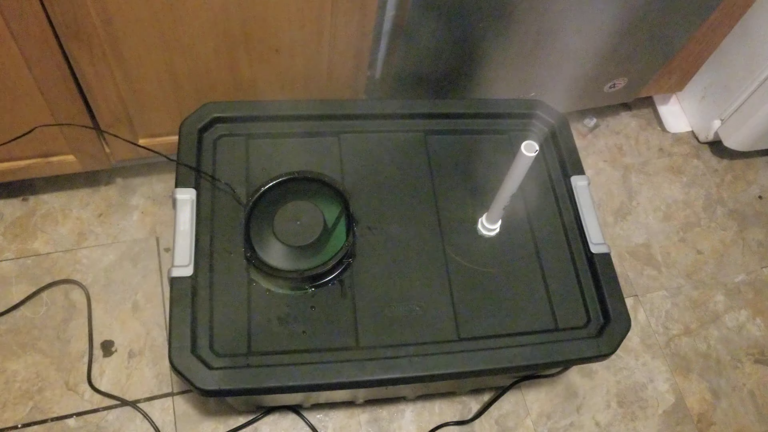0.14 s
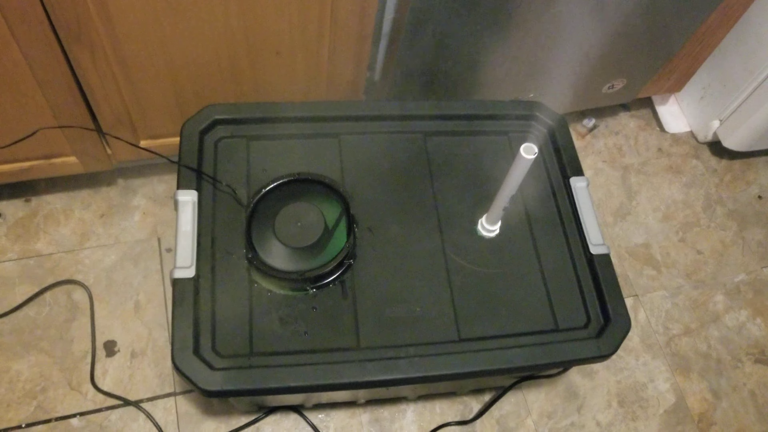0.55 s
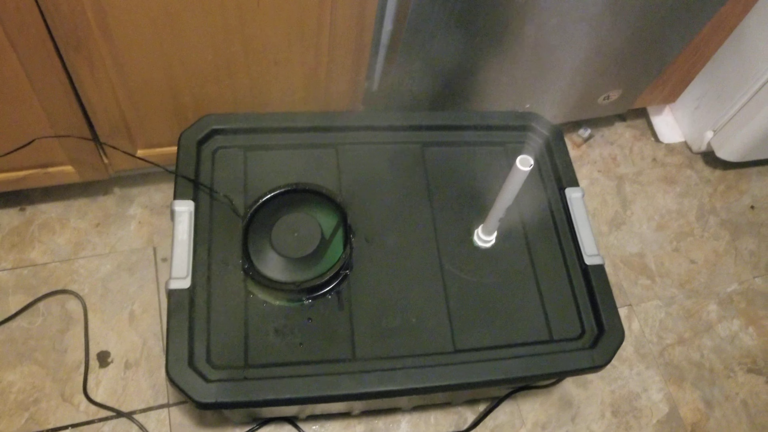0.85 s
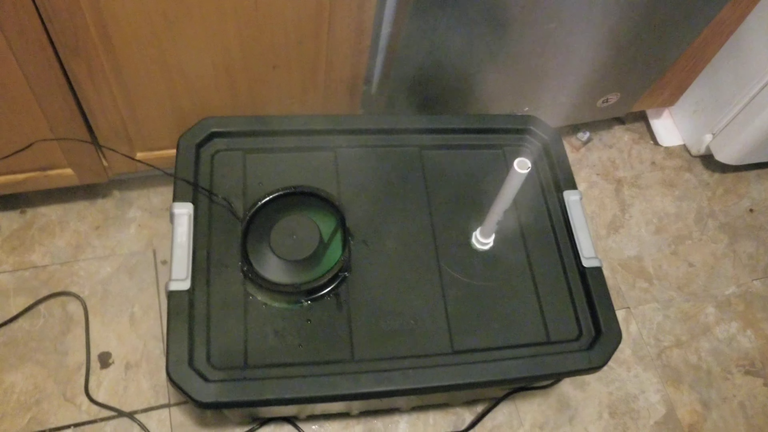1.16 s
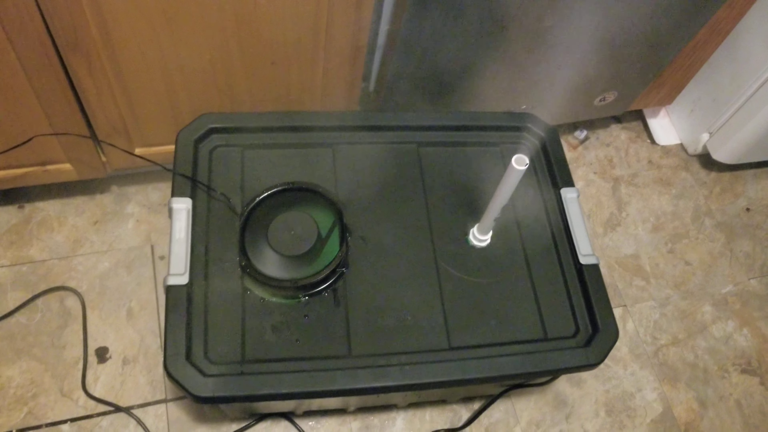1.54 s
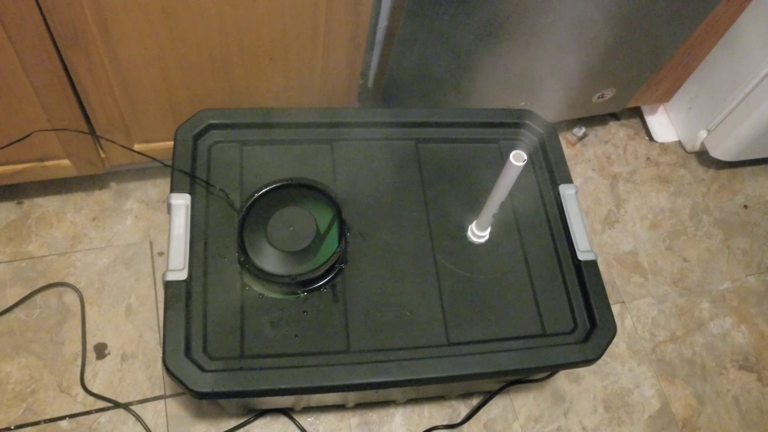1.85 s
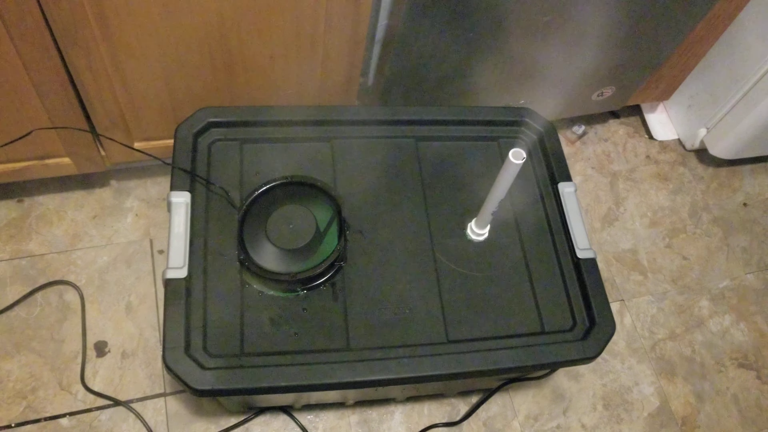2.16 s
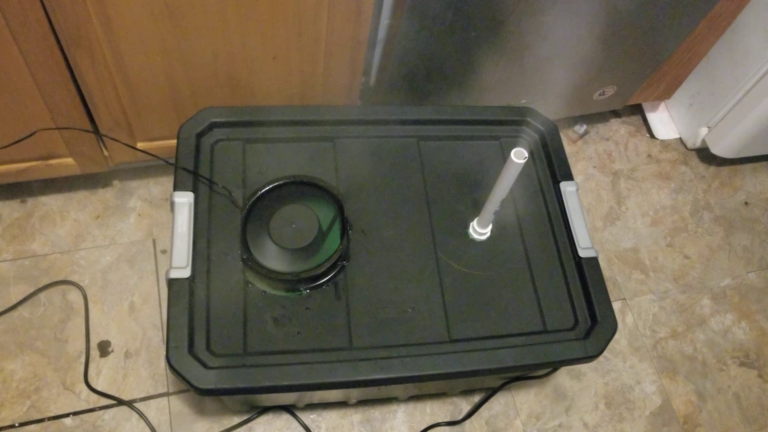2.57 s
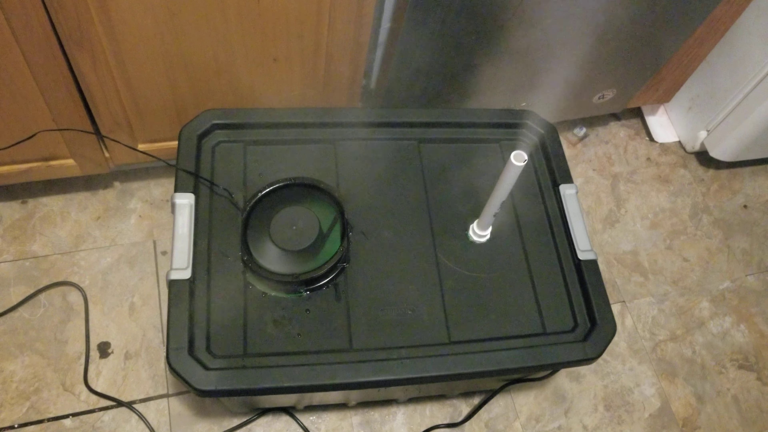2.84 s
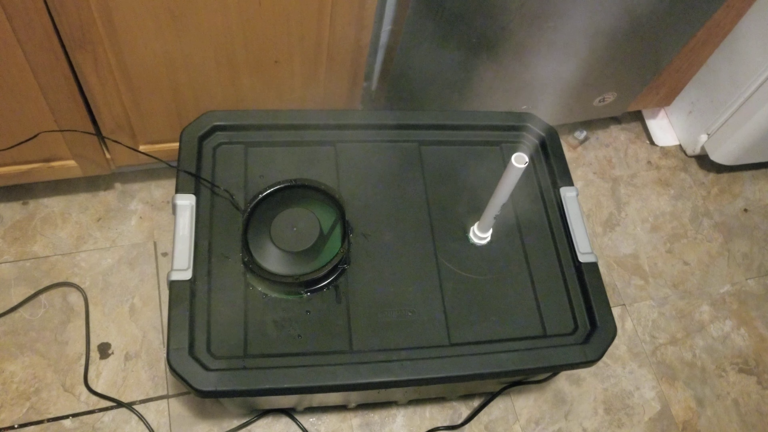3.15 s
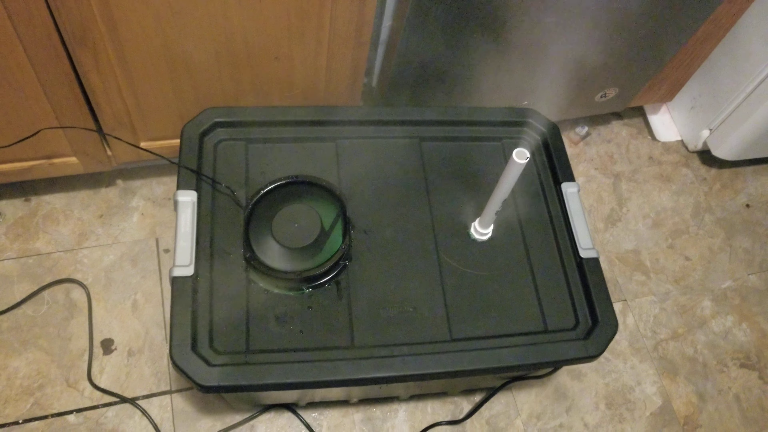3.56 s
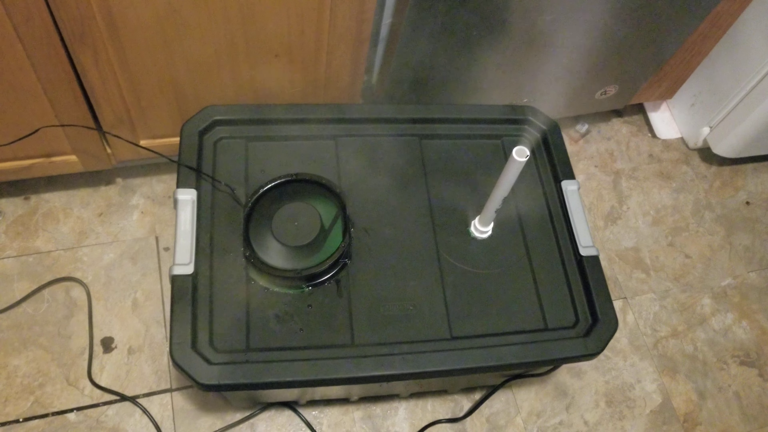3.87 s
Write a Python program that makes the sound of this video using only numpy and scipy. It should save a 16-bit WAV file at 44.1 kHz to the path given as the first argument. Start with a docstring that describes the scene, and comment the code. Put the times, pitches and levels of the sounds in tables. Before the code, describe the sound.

Small electric fan blowing with a hollow hum, a few faint drips and a close click.

```python
"""A small fan blows into a plastic tub on a tiled floor and drives mist out of a pipe.
After a short silence its turbulence fades in, booming in the tub and exciting narrow resonances over
a faint motor hum; a fine hiss and the tub's deep drone rise with it and swell and sink to the end.
A first drip falls, a very high, thin whistle arches up and down, and narrow bands of hiss swell briefly.
After a second drip comes one sharp click close by, at 1.6 s; then a few faint drips fall."""
import sys
import numpy as np
from scipy import signal
from scipy.fft import rfft, irfft
from scipy.io import wavfile

SR = 44100
rng = np.random.default_rng(int(sys.argv[2]) if len(sys.argv) > 2 else 0)


def to_wav(sig):
    """Store sig (one row per channel, or 1-D mono) as 16-bit WAV at the path in sys.argv[1].

    Samples outside -1..1 are clipped; the rate is SR.
    """
    pcm = np.clip(np.atleast_2d(sig), -1, 1) * 32767
    pcm = np.round(pcm).astype(np.int16)
    wavfile.write(sys.argv[1], SR, pcm.T)  # frames by channels


N = 176400
T, HZ = np.arange(N) / SR, np.maximum(np.fft.rfftfreq(N, 1 / SR), 1)


def from_db(db):
    """Amplitude ratio of a level in decibels."""
    return 10 ** (np.asarray(db) / 20)


def rms_one(x):
    """Normalisation to unit mean power."""
    return x / np.sqrt(np.mean(x ** 2) + 1e-20)


def at_hz(points):
    """Interpolation of a table on a log-frequency axis."""
    hz, value = np.transpose(points)
    return np.interp(np.log(HZ), np.log(hz), value)


def pan(db):
    """Constant-power panning: two gains, the left one higher by db."""
    gains = from_db(np.array([[.5], [-.5]]) * db)
    return gains / np.sqrt(np.mean(gains ** 2, axis=0))


def peak(centre_hz, half_width_hz):
    """Lorentzian curve: the amplitude halves one half-width from the centre."""
    return 1 / (1 + ((HZ - centre_hz) / half_width_hz) ** 2)


def drift(rate_hz):
    """Random fluctuation: low-pass noise of unit rms."""
    return rms_one(irfft(rfft(rng.standard_normal(N)) * peak(0, rate_hz), N))


# Likeness of the airflow's sound in the two channels: frequency_hz, coherence
COHERENCE = [(40, 0.89), (150, 1), (300, 0.99), (550, 0.89), (1000, 0.8), (1400, 0.67), (1600, 0.38),
             (1900, 0.82), (2600, 0.24), (4500, 0.29), (8000, 0.059), (11500, 0.25), (15500, .1)]
# Its balance between them: frequency_hz, left_over_right_db
AIR_BALANCE = [(100, 0.5), (300, 0), (500, 2), (800, -1.5), (1100, 5), (1600, -3.5), (2300, -1),
               (2800, -4.5), (3500, -2.5), (4000, 5.5), (4700, -11.5), (5500, -4), (7000, -0.5), (8200, 1),
               (9200, 1.5), (11000, 2.5), (12000, 2), (13300, 13), (15500, 19)]
# Its phase difference: frequency_hz, left_lead_rad
PHASE_LEAD = [(100, .03), (450, 0.11), (750, 0.48), (1200, 0.75), (1900, 1.55), (2500, 0.41), (2900, 3.76),
              (3700, 3.67), (4300, 4.1), (5000, 5.8), (6000, 6.5), (10500, 7.6), (12000, 8.6)]

def air_noise(spectrum, side_db=at_hz(AIR_BALANCE)):
    """Partial coherence: common and opposed noise add to a stereo pair of unit rms."""
    mid, side = rfft(rng.standard_normal((2, N)))
    coherence = np.clip(at_hz(COHERENCE), 0, .998)
    pair = np.sqrt(1 + coherence) * mid + np.sqrt(1 - coherence) * side * [[1], [-1]]
    phase = np.exp(1j * at_hz(PHASE_LEAD) * [[.5], [-.5]])
    return rms_one(irfft(pair * spectrum * pan(side_db) * phase, N))


# Spectra of the low boom in the tub and the fan's broad rush: frequency_hz, relative_density_db
BOOM_SPECTRUM = [(20, -34), (50, -38), (70, -25), (88, -16.5), (102, -14.5), (120, -5), (165, -2.5),
                 (220, -3), (305, -3), (345, -8.5), (460, -10.5), (500, -19), (560, -16.5), (700, -23.5),
                 (1500, -61)]
RUSH_SPECTRUM = [(290, -18), (500, -3.5), (538, -9.5), (632, -9.5), (733, -7), (937, -5.5), (973, -10),
                 (1090, -6), (1360, -7), (1610, -13), (1890, -6), (2040, -8.5), (2480, -7), (3680, -13),
                 (4540, -13.5), (7800, -30), (9500, -30), (12400, -42), (20900, -120)]

def turbulence(spectrum, level_db, flutter_db=1):
    """Turbulent flow radiates broadband noise whose level flutters."""
    gain = from_db(level_db + flutter_db * drift(28))
    return gain * air_noise(from_db(at_hz(spectrum)))


# Modes of tub, pipe and fan housing: pitch_hz, half_width_hz, level_db, left_over_right_db
AIRFLOW_MODES = [(181.6, 6.7, -52, 2.5), (298.4, 13.3, -55, 0.5), (384.3, 5.2, -66.5, 3),
                 (424, 4.8, -68.5, 3), (465, 9.7, -63.5, 6), (531, 12, -60, 5), (729, 24, -66.5, -7),
                 (761, 22, -67, 7), (992, 9.3, -64, 3.5), (1012, 10, -70.5, -20), (1116, 15, -71, 2),
                 (1284, 12, -66.5, -6), (1375, 8.9, -67.5, 0), (1880, 30, -63, 4), (2375, 23, -73, -10),
                 (2830, 42, -68, -7), (3190, 150, -64, -1), (4600, 240, -68, 3), (7430, 60, -83, 0)]

def resonances():
    """Forced resonance: each mode driven by turbulence sounds as a narrow band of noise."""
    return sum(from_db(db) * air_noise(peak(hz, width), side) for hz, width, db, side in AIRFLOW_MODES)


# Tones of the motor: pitch_hz, level_db
MOTOR_TONES = [(295, -61.5), (1369, -69.5)]

def motor_hum(wander_rad=0.19):
    """Periodic vibration of the motor radiates tones, each wandering slightly in phase."""
    hum = np.zeros(N)
    for hz, db in MOTOR_TONES:
        phase = 2 * np.pi * (hz * T + rng.random()) + wander_rad * drift(5)
        hum += from_db(db) * np.sqrt(2) * np.sin(phase)
    return hum


# Spectrum of the fine hiss: frequency_hz, relative_density_db
HISS_SPECTRUM = [(5000, -47), (8500, -15.5), (11000, 1), (13100, -1.5), (15100, 5), (15800, -3.5)]
# Its envelope, in two consecutive runs of rows: time_s, relative_level_db
HISS_ENVELOPE = [
    [(0.35, -96), (0.44, -75), (0.46, -76), (0.478, -68.5), (0.742, -61), (0.764, -62), (0.788, -62),
     (0.888, -65), (1.14, -58.5), (1.258, -60.5), (1.328, -59), (1.474, -63.5), (1.536, -63), (1.6, -63)],
    [(1.67, -61), (1.95, -64.5), (2.1, -60), (2.19, -66), (2.44, -57.5), (2.71, -64.5), (3.03, -60),
     (3.38, -64), (3.4, -59), (3.66, -64.5), (3.69, -59.5), (3.92, -62), (3.94, -55.5), (4.0, -63)],
]

def hiss(gain_db=3, sputter_db=1.2):
    """Amplitude modulation: treble noise, mostly on the left, swells, sinks and sputters."""
    times, levels = np.vstack(HISS_ENVELOPE).T
    gain = from_db(gain_db + np.interp(T, times, levels) + sputter_db * drift(70))
    return gain * air_noise(from_db(at_hz(HISS_SPECTRUM)))


# Surges of the tub's deep resonance: time_s, relative_level_db
TUB_ENVELOPE = [(.35, -78), (.6, -57.5), (1.0, -48.5), (1.17, -46), (1.239, -29.5), (1.3, -47.5),
                (1.37, -35), (1.45, -45.5), (1.7, -46.5), (1.83, -40), (2.0, -53), (2.12, -39),
                (2.3, -50.5), (2.8, -40.5), (3.0, -51.5), (3.3, -44), (3.6, -43), (3.9, -49.5), (4, -44)]

def tub_drone(pitch_hz=134.9, noise_db=-4, tone_db=-6):
    """Cavity resonance: the air in the tub drones as a wavering tone in narrow noise."""
    times, levels = np.transpose(TUB_ENVELOPE)
    noise = air_noise(peak(pitch_hz, half_width_hz=19.4) ** 2, side_db=0)
    tone = np.sqrt(2) * np.sin(2 * np.pi * pitch_hz * T + drift(3.5))
    return from_db(np.interp(T, times, levels)) * (from_db(noise_db) * noise + from_db(tone_db) * tone)


# Drips in the tub: start_s, relative_level_db, pitch_hz, decay_s, left_over_right_db
DRIP_SPLASHES = [(0.398, -34.5, 3100, 0.00072, -7), (1.3165, -30.5, 4500, 0.0014, -8),
                 (2.299, -42, 3500, 0.0037, -1), (2.593, -43.5, 3700, 0.013, -1),
                 (3.054, -44.5, 3500, 0.017, -1), (3.414, -41, 4500, 0.023, -6),
                 (3.7, -43.5, 4600, 0.016, -5), (3.818, -43, 5130, 0.02, -9)]

def drips(bandwidth_hz=640, lowpass_hz=6000):
    """Transient excitation: each splash is a decaying noise burst through one bright resonance."""
    splashes = np.zeros((2, N))
    radius = np.exp(-np.pi * bandwidth_hz / SR)
    for start, db, hz, decay, side in DRIP_SPLASHES:
        burst = rng.standard_normal(N) * (T >= start) * np.exp(-np.abs(T - start) / decay)
        feedback = [1, -2 * radius * np.cos(2 * np.pi * hz / SR), radius ** 2]
        splash = signal.lfilter([1, 0, -1], feedback, burst + 1e-18)
        splashes += pan(side) * from_db(db) * splash / np.abs(splash).max()
    return signal.sosfilt(signal.butter(2, lowpass_hz, fs=SR, output="sos"), splashes)


# Course of the thin whistle: time_s, pitch_hz, relative_level_db
WHISTLE_GLIDE = [(.442, 14000, -76), (.46, 14750, -57), (.5, 15750, -66), (.6, 16600, -72),
                 (.735, 15800, -64), (.755, 14800, -51), (.775, 14200, -55), (.8, 12100, -74)]

def whistle(waver_hz=130, flutter_db=4, side_db=18):
    """Frequency modulation: an unsteady tone on the left arches up out of hearing and returns."""
    times, pitches, levels = np.transpose(WHISTLE_GLIDE)
    pitch = np.interp(T, times, pitches) + waver_hz * drift(300)
    gain = from_db(np.interp(T, times, levels) + flutter_db * drift(60))
    sounding = (T > times[0]) * (T < times[-1])
    return pan(side_db) * gain * sounding * np.sin(2 * np.pi * np.cumsum(pitch) / SR)


# Brief, faint swells of high hiss: peak_s, half_length_s, relative_level_db, centre_hz, half_width_hz
HISS_SWELLS = [(0.692, 0.12, -51, 3420, 520), (1.216, 0.17, -57.5, 4580, 220), (.67, .12, -61, 11800, 500),
               (.68, .08, -59, 14600, 500), (1.114, 0.062, -59, 11200, 700), (2.42, .06, -65, 14400, 400)]

def hiss_swells():
    """Narrow-band noise: each high band of hiss swells and fades under a Gaussian envelope."""
    swells = np.zeros((2, N))
    for peak_s, half_length, db, hz, width in HISS_SWELLS:
        envelope = np.exp(-((T - peak_s) / half_length) ** 2)
        swells += from_db(db) * envelope * air_noise(peak(hz, width))
    return swells


def ring(impulses, hz, t60):
    """Damped oscillator: each impulse starts a sine that falls 60 dB in t60 seconds."""
    radius, angle = from_db(-60 / (t60 * SR)), 2 * np.pi * hz / SR
    feedback = [1, -2 * radius * np.cos(angle), radius ** 2]
    return signal.lfilter([0, np.sin(angle)], feedback, impulses + 1e-18)


# Contacts within the one click: start_s, relative_level_db, left_over_right_db
CLICK_CONTACTS = [(1.6309, -19, -1), (1.633, -34, -5), (1.6329, -26, 16), (1.6329, 3.5, 5.5),
                  (1.6353, -21, 17)]
# Modes of the struck plastic: pitch_hz, relative_level_db, t60_s, left_over_right_db
PLASTIC_MODES = [(300, -30, 0.019, 14), (560, -19, 0.0069, 8), (1160, -17.5, 0.0056, 2),
                 (1940, -13.5, 0.0038, 9), (2930, -10, 0.0041, -0.5), (4160, -16, 0.0077, -1.5),
                 (4740, -14.5, 0.008, 0), (7740, -13, 0.0022, 0.5), (10300, -9.5, 0.0027, -5.5),
                 (14400, -14, 0.0012, 13)]

def click(gain_db=-3, right_lag_s=.00002):
    """Modal superposition: a quick run of hard contacts rings well-damped plastic."""
    contacts = sum(pan(side) * from_db(db) * (np.arange(N) == int(start * SR))
                   for start, db, side in CLICK_CONTACTS)
    ringing = sum((-1) ** k * pan(side) * from_db(db) * ring(contacts, hz, t60)   # alternating polarity
                  for k, (hz, db, t60, side) in enumerate(PLASTIC_MODES))
    left, right = from_db(gain_db) * ringing
    return np.array([left, np.interp(T - right_lag_s, T, right)])


def knock(centre_s=1.647, pitch_hz=79.5, half_length_s=0.012, level_db=-36.5):
    """Gaussian tone pulse: a few low cycles make a soft knock just after the click."""
    t = T - centre_s
    return from_db(level_db) * np.exp(-(t / half_length_s) ** 2) * np.sin(2 * np.pi * pitch_hz * t)


def scene(start_s=0.35, rise_s=0.24):
    """Superposition: the sources add; fine hiss, drone and whistle bypass the common fade-in."""
    fade = (1 - np.exp(-np.maximum(T - start_s, 0) / rise_s)) ** 1.2
    boom = turbulence(BOOM_SPECTRUM, level_db=-42.5)
    rush = turbulence(RUSH_SPECTRUM, level_db=-49.5)
    fan = boom + rush + resonances() + motor_hum()
    events = drips() + hiss_swells() + click() + knock()
    return fade * (fan + events) + (T > start_s) * (hiss() + tub_drone()) + whistle()


def record(dry, cutoff_hz=15900):
    """Band limiting: an elliptic low-pass filter cuts the highest treble steeply."""
    return signal.sosfilt(signal.ellip(12, .1, 70, cutoff_hz, fs=SR, output="sos"), dry)


dry = scene()
out = record(dry)
to_wav(out)
```